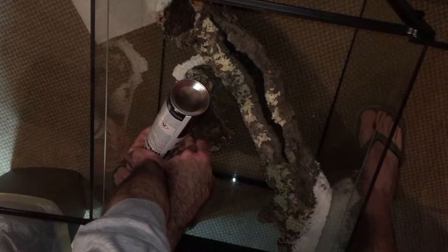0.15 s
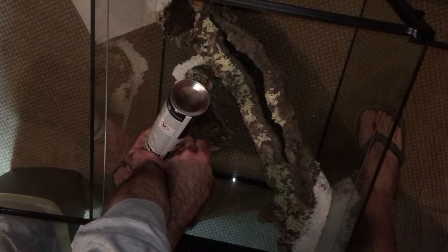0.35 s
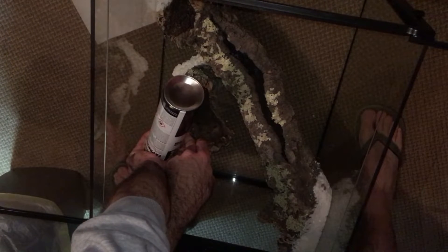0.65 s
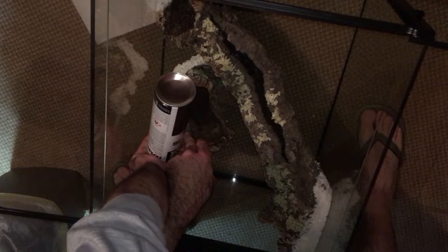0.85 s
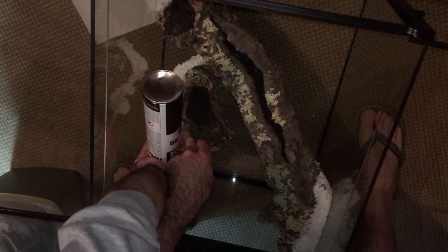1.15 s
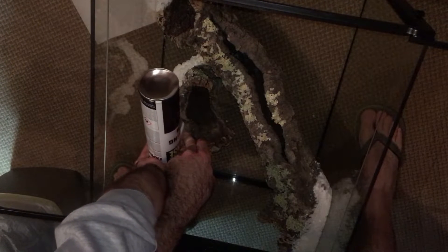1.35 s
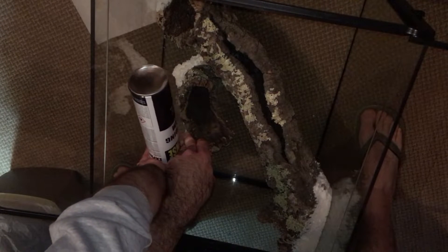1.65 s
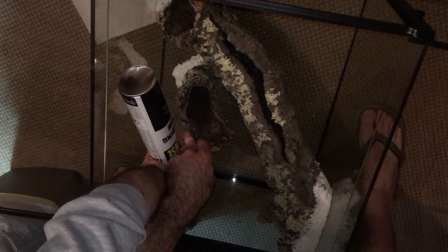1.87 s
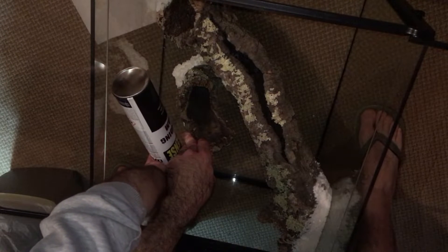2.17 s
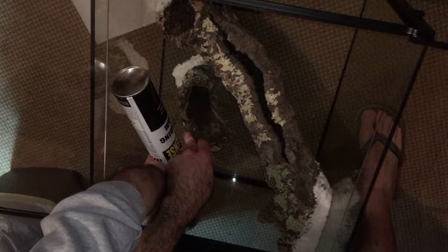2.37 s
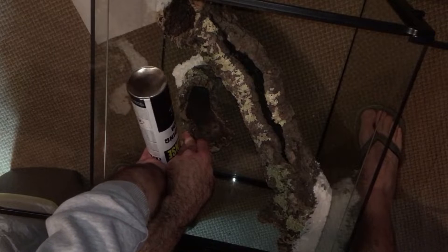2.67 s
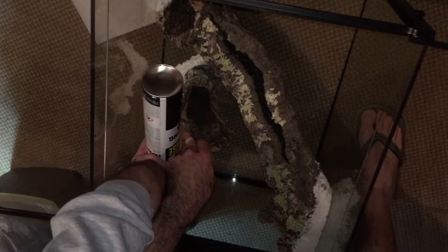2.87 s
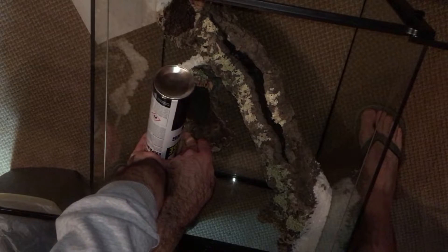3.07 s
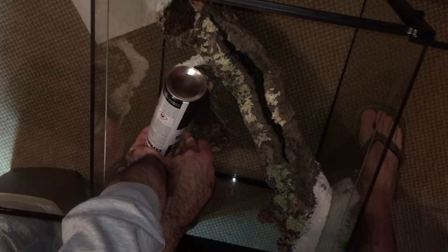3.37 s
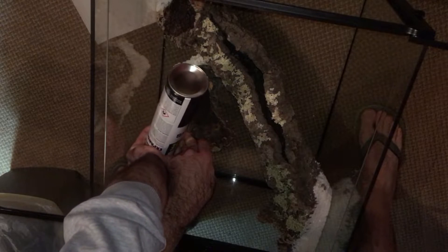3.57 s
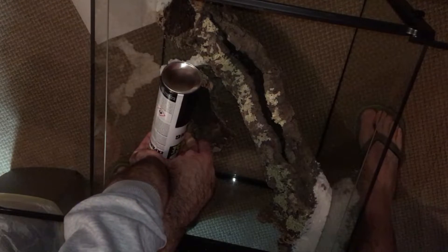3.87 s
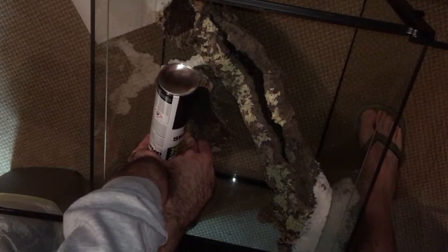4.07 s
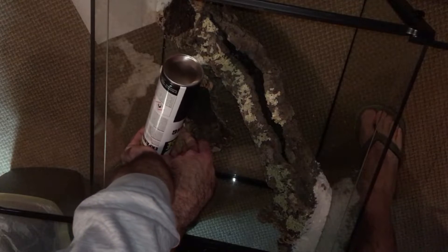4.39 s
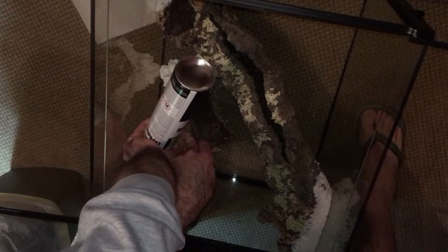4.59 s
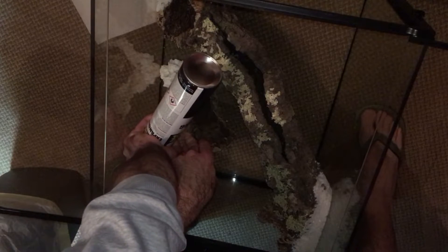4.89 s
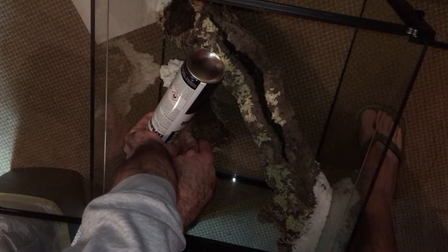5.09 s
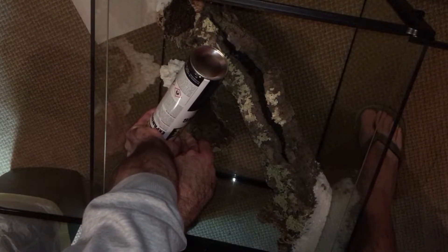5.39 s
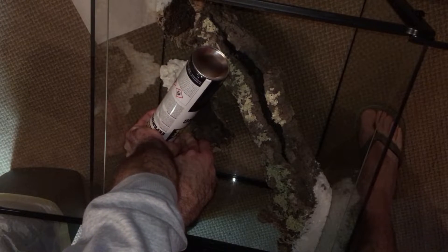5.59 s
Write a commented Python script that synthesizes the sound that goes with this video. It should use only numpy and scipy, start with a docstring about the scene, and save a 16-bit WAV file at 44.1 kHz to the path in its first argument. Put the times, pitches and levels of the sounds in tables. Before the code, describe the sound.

Close and mono in a small room with slight glassy resonance: a foam can hisses softly while bubbles pop and gurgle wetly. The flow thins, then gulps back with a hard wet pop and hollow ringing. It pauses, resumes, and bursts into rough crackling spray past the middle. Faint crackles die into quiet room air and low hum before one last bright, dry blast.

```python
"""Wet pops and a low gurgle over a hiss: expanding foam is squeezed from an upturned can into a glass tank.
Streams of ringing bubbles make the foam, filtered noise and clicks the hiss of the valve.
Twice, propellant breaks through in a loud, ragged spurt of crackle; fainter crackling follows the first.
The mono microphone is close, indoors: tank resonances and a small room colour the can and its foam,
over quiet room air and hum."""
import sys
import numpy as np
from scipy import signal
from scipy.fft import rfft, irfft, next_fast_len
from scipy.io import wavfile
from scipy.ndimage import uniform_filter1d

SR = 44100
rng = np.random.default_rng(int(sys.argv[2]) if len(sys.argv) > 2 else 0)


def wrap_up_sound(samples):
    """Save the sound to the file named by the first command line argument, as 16-bit audio."""
    columns = np.atleast_2d(samples).T
    # keep every value between -1 and 1, then stretch to whole-number steps
    tamed = np.clip(columns, -1, 1)
    steps = np.round(tamed * 32767).astype(np.int16)
    wavfile.write(sys.argv[1], SR, steps)


N = 253442
TIME = np.arange(N) / SR
SIZE = next_fast_len(N + SR)  # transform length, with room for filter tails
FREQ = np.maximum(np.arange(SIZE // 2 + 1) * SR / SIZE, 1)

# The largest bubbles bursting at the nozzle, and at 2.114 s the pop of a plug of foam letting go with a thud.
# Each row: time in seconds, relative peak in dB, pitch in Hz.
BURSTS = [(0.002, -19, 1000), (0.023, -15, 1450), (0.139, -19, 1020), (0.224, -20.5, 1020),
          (0.328, -20, 1040), (0.53, -20, 950), (0.573, -26, 923), (0.637, -26, 964), (0.705, -27.5, 910),
          (0.771, -28.5, 1020), (0.874, -29.5, 1060), (1.128, -28, 1050), (1.363, -27.5, 1180),
          (1.41, -29, 980), (1.48, -26, 1180), (1.514, -25.5, 993), (1.6, -22.5, 1390),
          (1.722, -22.5, 1180), (1.766, -27, 1170), (1.873, -26, 1170), (1.977, -21.5, 1400),
          (2.114, -13.5, 1950), (2.203, -17, 1100), (2.349, -19.5, 1170), (2.52, -14, 1110),
          (2.657, -16, 1070), (2.754, -18, 1040), (3.544, -18, 1100), (5.492, -30.5, 900),
          (5.528, -23.5, 900)]
# Propellant breaking through, one curve for each spurt.
# Each row: time in seconds, jet level in dB, dry spray relative to the jet in dB.
SPURT_CURVES = [
    [(3.62, -44.5, 2), (3.655, -31.5, -12), (3.675, -18, -11.5), (3.808, -15, -5.5), (3.856, -22.5, 0),
     (3.894, -15.5, -5.5), (3.962, -16.5, -9.5), (4.006, -25, -8), (4.06, -41.5, -16)],
    [(5.53, -36, -7.5), (5.592, -26.5, -3.5), (5.622, -10.5, -6.5), (5.675, -21, -1), (5.71, -19, -3),
     (5.74, -15.5, -11)],
]


def undb(db):
    """Decibels to gain."""
    return 10 ** (np.asarray(db) / 20)


def follow(table):
    """The columns of a control table at every sample."""
    s, *columns = np.transpose(table)
    return [np.interp(TIME, s, c) for c in columns]


def shape(x, db):
    """Causal minimum-phase filter with the given gain at every frequency."""
    cepstrum = irfft(db * np.log(10) / 20, SIZE)
    # fold the cepstrum onto positive time, so that nothing rings ahead of its cause
    cepstrum[1:SIZE // 2] *= 2
    cepstrum[SIZE // 2 + 1:] = 0
    response = np.exp(rfft(cepstrum))
    return irfft(rfft(x, SIZE) * response, SIZE)[:N]


def colour(x, points):
    """Filter by a spectrum of (Hz, dB) points, falling away beyond its ends."""
    hz, db = np.transpose(points)
    octaves_beyond = np.maximum(np.log2(hz[0] / FREQ), 0) + np.maximum(np.log2(FREQ / hz[-1]), 0)
    inside_db = np.interp(np.log(FREQ), np.log(hz), db)
    return shape(x, inside_db - np.minimum(24 * octaves_beyond, 60))


def band(x, lo, hi):
    """The part of a sound between two frequencies; neighbouring bands add up to the whole."""
    above = np.interp(FREQ, [.9 * lo, 1.1 * lo], [0, 1])
    below = np.interp(FREQ, [.9 * hi, 1.1 * hi], [1, 0])
    return irfft(rfft(x, SIZE) * above * below, SIZE)[:N]


def steady(x, lo, hi):
    """Scale a sound so that its band lo-hi holds rms 1 over each eighth of a second."""
    power = uniform_filter1d(band(x, lo, hi) ** 2, SR // 8)
    return x / np.sqrt(power + 1e-18)


def walk(rate):
    """Smooth chance with a spread near 1, changing rate times a second."""
    return np.interp(TIME * rate, np.arange(4096), rng.standard_normal(4096)) * np.sqrt(3 / 2)


def clicks(rate, spread_db):
    """Clicks at random moments, many small and a few large; rms 1."""
    size = undb(spread_db * np.minimum(rng.exponential(size=N), 4))
    sign = rng.choice([-1, 1], N)
    x = size * sign * (rng.random(N) < rate / SR)
    return x / np.std(x)


def ring(x, hz, width_hz):
    """A resonance with gain 1 at its centre."""
    return signal.lfilter(*signal.iirpeak(hz, hz / width_hz, fs=SR), x)


def swell(start, end, rise_s, fall_s):
    """An envelope that rises to 1 at its start, holds to its end and dies away."""
    before, after = np.maximum(start - TIME, 0), np.maximum(TIME - end, 0)
    return np.exp(-before / rise_s - after / fall_s) + 1e-12


def decays(times, sizes, fade_s):
    """An envelope that jumps at each time and dies away."""
    kicks = np.bincount(np.abs(times * SR).astype(int), sizes, N)[:N]
    return signal.lfilter([1], [1, -np.exp(-1 / (fade_s * SR))], kicks + 1e-18)


def bubbles(rows, cycles, glide):
    """Each (s, peak dB, Hz) bubble rings for a few cycles, rising in pitch as its skin opens."""
    s, db, hz = np.transpose(rows)
    length = (SR * cycles / hz).astype(int)
    bubble = np.repeat(np.arange(len(s)), length)  # which bubble each sample belongs to
    step = np.arange(len(bubble)) - (np.cumsum(length) - length)[bubble]
    age = step / length[bubble]  # 0 to 1 over the life of a bubble
    fade = np.exp(-np.log(1000) * age)
    wave = undb(db)[bubble] * fade * np.sin(2 * np.pi * cycles * age * (1 + glide * age))
    return np.bincount(np.abs(s * SR).astype(int)[bubble] + step, wave, N)[:N]


def froth(rate, centre_hz, octaves, spread_db, cycles):
    """A random stream of bubbles of mixed sizes."""
    when, size, pitch = rng.random((int(rate * N / SR), 3)).T
    db = spread_db * np.minimum(-np.log(1 - size), 4)
    hz = centre_hz * 2 ** (octaves * (2 * pitch - 1))
    return bubbles(np.transpose([when * N / SR, db, hz]), cycles, glide=0.17)


def room_tone():
    """Quiet room air as filtered noise over a mains hum that wavers in phase and level."""
    # Spectrum of the room air. Each row: frequency in Hz, relative level in dB.
    air_spectrum = [(40, -17.5), (60, -10.5), (115, -15.5), (160, -14.5), (350, -26.5), (800, -30.5),
                    (1900, -30.5), (2900, -37.5), (6000, -42), (13000, -42), (15700, -48.5)]
    air_db, hum_hz, hum_db = -64, 48, -67.5
    air = steady(colour(rng.standard_normal(N), air_spectrum), 70, 15800)
    hum = np.sqrt(2) * np.sin(2 * np.pi * hum_hz * TIME + .3 * walk(5.0))
    return undb(air_db + .8 * walk(5.4)) * air + undb(hum_db + 1.7 * walk(5)) * hum


def settling():
    """After the first spurt the fresh foam keeps crackling and burbling, ever more faintly."""
    spectrum = [(90, 9.5), (200, 15.5), (600, 2.5), (1500, 1.5), (4000, -15.0), (8000, -23.0), (15000, -20.5)]
    crackle = colour(clicks(rate=2300, spread_db=4.0), spectrum)
    age = TIME - SPURT_CURVES[0][-1][0]
    fade = np.exp(-np.abs(age) / 0.23) * (age > 0)
    return undb(-48.5) * fade * crackle / np.std(crackle)


def whistles():
    """The half-open valve whistles faintly as gas rings narrow resonances in it."""
    # Whistles at the valve. Each row: start in seconds, end in seconds, pitch in Hz, level in dB.
    whistle_rows = [(0, 0.752, 8170, -60), (1.0, 1.713, 5550, -63.5), (1.1, 1.698, 4520, -69)]
    gas, out = rng.standard_normal(N), 0
    for start, end, hz, db in whistle_rows:
        tone = ring(gas, hz, width_hz=120)
        out = out + undb(db) * swell(start, end, rise_s=.03, fall_s=.03) * tone / np.std(tone)
    return out


def valve():
    """Propellant hisses through the valve, and now and then rasps out between the bubbles."""
    # Opening of the valve, one curve for each pull of the trigger.
    # Each row: time in seconds, level of the finest mist in dB.
    openings = [
        [(0.0, -66), (0.45, -64), (0.75, -67), (1.85, -58.5), (2.4, -66.5), (2.85, -71.5), (3.3, -60),
         (3.5, -60), (3.62, -45)],
        [(5.43, -71.5), (5.52, -57)],
    ]
    # Gas surging through the foam. Each row: time in seconds, rasp level in dB, rise in seconds,
    # fall in seconds, hiss relative to the rasp in dB.
    surges = [(0.01, -51, 0.014, 0.057, -11), (1.9, -55, 0.27, .2, -28), (2.097, -38, 0.017, .018, -17),
              (2.18, -38, 0.026, .085, -18.5), (2.585, -33, .06, .035, -7.5)]
    # Spectrum of the hiss. Each row: frequency in Hz, relative level in dB.
    hiss_spectrum = [(1290, -34.5), (2200, -9), (2930, -5.5), (3160, -1.5), (4010, -5.5), (4460, -1),
                     (5000, -1), (5480, 2), (6620, -3), (9660, -3), (15700, -16)]
    # Spectrum of the rasp. Each row: frequency in Hz, relative level in dB.
    rasp_spectrum = [(2300, 0.5), (3100, -4.5), (4400, 0), (5100, -11.5), (6700, -14.5), (7500, -28),
                     (10000, -27.5), (15700, -31)]
    # the coarse hiss grows more slowly than the mist: its level at a reference mist, dB gained per dB of mist
    reference_hiss_db, reference_mist_db, hiss_per_mist = -54, -63.5, .28
    fade_s = 0.059  # time constant of the valve opening and shutting

    gas = rng.standard_normal(N) + undb(-2.0) * clicks(rate=1200, spread_db=3.0)
    hiss = colour(gas, hiss_spectrum) * undb(.6 * walk(40))
    coarse = band(hiss, 1, 10600)
    mist = steady(hiss - coarse, 11000, 15500)
    coarse = steady(coarse, 5200, 10000)
    rasp = colour(clicks(rate=1800, spread_db=3.5) * undb(3 * walk(70)), rasp_spectrum)
    rasp = steady(rasp, 2900, 6500)

    out = 0
    for pull in openings:
        (mist_db,) = follow(pull)
        coarse_db = reference_hiss_db + hiss_per_mist * (mist_db - reference_mist_db)
        is_open = swell(pull[0][0], pull[-1][0], fade_s, fade_s)
        out = out + is_open * (undb(coarse_db) * coarse + undb(mist_db) * mist)
    for s, db, rise, fall, hiss_db in surges:
        surge = rasp + undb(hiss_db) * (coarse + undb(-22) * mist)
        out = out + undb(db) * swell(s, s, rise, fall) * surge
    return out


def spits():
    """Small pockets of gas spit through the skin of the foam in puffs of a few milliseconds."""
    # Pockets of gas escaping. Each row: time in seconds, relative level in dB.
    pockets = [(1.725, -35), (1.925, -35), (2.0549, -25.5), (2.111, -25.5), (2.449, -28.5), (2.49, -26),
               (2.7104, -33), (3.2725, -35.5), (3.3156, -34), (3.4766, -34), (3.56, -26.5), (3.6065, -30),
               (4.3092, -60), (4.4594, -56), (4.5294, -56), (5.1499, -65)]
    s, db = np.transpose(pockets)
    gas = colour(rng.standard_normal(N), [(1000, 1.5), (4000, 2.5), (7000, -9.5), (15000, -18)])
    return undb(-4.5) * decays(s, undb(db), fade_s=0.0071) * gas / np.std(gas)


def spurts():
    """Gas tears the foam into droplets: dense crackle over a jet, wet and low or dry and sharp."""
    # What each spurt carries. Each row: wet splutter at full jet in dB, finest mist relative to the jet in dB
    # where the dry spray equals the jet.
    loads = [(-24, -10.5), (-29.5, 1)]
    # One spectrum for each spurt. Each row: frequency in Hz, relative level in dB.
    spectra = [
        [(59, -61), (100, -26.5), (243, -20), (313, -27.5), (413, -19), (449, -23.5), (555, -10.5), (865, -10),
         (1020, -5), (1530, -6.5), (2390, -1), (2890, -5.5), (3280, -4), (8860, -18), (15700, -30)],
        [(59, -47), (100, -17.5), (459, -17), (715, -5.5), (795, -11.5), (1670, -5.5), (1810, -4), (1970, -2.5),
         (3800, -4.5), (5000, -8.5), (5560, -1), (9640, -7), (10500, -3), (12400, 2), (15700, -6)],
    ]
    # the wet splutter grows slowly with the jet; the mist grows faster than the dry spray (dB per dB)
    full_jet_db, wet_per_jet, mist_per_dry = -14, 0.23, 1.3

    jet = clicks(rate=2500, spread_db=1.0) + undb(-2) * rng.standard_normal(N)
    jet = jet * undb(1.0 * walk(120))
    out = 0
    for curve, (wet_db, mist_db), spectrum in zip(SPURT_CURVES, loads, spectra):
        db, dry_db = follow(curve)
        gas = colour(jet, spectrum)
        wet = steady(band(gas, 70, 1450), 400, 1400)
        core = steady(band(gas, 1450, 5100), 1500, 5000)
        dry_spray = steady(band(gas, 5100, 10400), 5200, 10000)
        mist = steady(band(gas, 10400, SR), 10500, 15500)
        spray = core + undb(dry_db) * dry_spray + undb(mist_db + mist_per_dry * dry_db) * mist
        splutter = undb(wet_db + wet_per_jet * (db - full_jet_db)) * wet
        blowing = swell(curve[0][0], curve[-1][0], rise_s=0.005, fall_s=0.015)
        out = out + blowing * (undb(db) * spray + splutter)
    return out


def pops():
    """A large bubble bursts and sets off its neighbours in a short wet spatter; a loosened plug thuds."""
    # Plugs of foam letting go with a thud. Each row: time in seconds, level of the thud's low body in dB.
    plugs = [(2.114, -30)]
    burst = bubbles(BURSTS, cycles=14, glide=0.14)
    snap = band(bubbles(BURSTS, cycles=2.5, glide=0.61), lo=797, hi=6000)
    age = TIME[:SR // 10]
    spatter = rng.standard_normal(len(age)) * np.exp(-age / .011)
    spatter = spatter / np.linalg.norm(spatter)
    out = undb(-4.5) * burst + undb(5.0) * signal.fftconvolve(snap, spatter)[:N]
    for s, db in plugs:
        age = np.maximum(TIME - s, 0)
        body = np.sin(2 * np.pi * 172 * age) * np.exp(-age / .07)
        splat = band(rng.standard_normal(N), lo=256, hi=2400) * np.exp(-age / 0.015) * (age > 0)
        out = out + undb(db) * (body + undb(19.5) * splat)
    return out


def choke(depth_db, swell_s, gush_db, gush_s):
    """Gain of the flow: a swelling bubble blocks the nozzle; when it bursts, the held-back foam gushes out."""
    s, each = np.transpose(BURSTS)[0], np.ones(len(BURSTS))
    gush = decays(s, each, gush_s)
    blocked = decays(N / SR - s, each, swell_s)[::-1]  # a decay run backwards, growing up to each burst
    return undb(gush_db * gush - depth_db * blocked)


def foam():
    """Foam comes in uneven gulps: bubbles burst, a hollow rings with them and the straw gurgles."""
    # Foam leaving the nozzle, one curve for each pull of the trigger.
    # Each row: time in seconds, flow as splutter level in dB, small bubbles relative to it in dB.
    flow_curves = [
        [(0.0, -32, -1.5), (0.2, -35.5, -7), (0.45, -40, -8.5), (0.58, -38, -13), (0.63, -45.5, -10.5),
         (0.8, -52, -8), (1.02, -55.5, -11.5), (1.65, -47.5, -7), (2.05, -41, -5.5), (2.15, -31, -2.5),
         (2.27, -40, -1.5), (2.62, -31.5, -4), (2.72, -35, -9), (2.95, -52, -1.5), (3.12, -56, -6),
         (3.22, -46.5, -10.5), (3.42, -51.5, -8.5), (3.5, -40.5, -12), (3.62, -37.5, -5.5)],
        [(5.31, -77.5, -5), (5.405, -66.5, -5), (5.428, -51.5, -11), (5.48, -53, -9), (5.52, -54, -3)],
    ]
    # A hollow in the foam opens, rings under the popping and closes.
    # Each row: time in seconds, level in dB, rise in seconds, fall in seconds, pitch in Hz.
    hollows = [(2.03, -43.5, .16, .06, 1163), (2.28, -34, .1, 0.24, 1165), (2.51, -27, 0.036, 0.033, 1153),
               (2.69, -29, 0.059, .035, 1158), (2.765, -35.5, .02, .05, 1060)]
    # Spectrum of the bubbles. Each row: frequency in Hz, relative level in dB.
    bubble_spectrum = [(300, -27.5), (560, -16), (750, -8.5), (950, -1), (1340, -2), (1660, -4.5),
                       (2200, -8), (2900, -15.5), (4200, -21.5), (5000, -33)]
    # Spectrum of the gurgle. Each row: frequency in Hz, relative level in dB.
    gurgle_spectrum = [(72, -16), (92, 3.5), (120, -1.9), (138, -6), (172, 3), (240, 1.5), (330, -3.5),
                       (430, -2.5), (580, -13.5)]
    # the gurgle follows the flow: its level at a reference flow as the straw starts to fill, dB per dB of flow
    reference_gurgle_db, reference_flow_db, gurgle_per_flow = -50.5, -42.5, 0.5
    fill_db_per_s, straw_full_s = 1.96, 2.3  # it grows as the straw fills, then the straw stays full
    fade_s = 0.04  # time constant of the flow building up before a pull and dying after it

    gulps = walk(75)
    stream = froth(rate=900, centre_hz=1152, octaves=0.91, spread_db=2.5, cycles=5)
    stream += undb(1.5) * froth(rate=2000, centre_hz=3000, octaves=.8, spread_db=4.5, cycles=5)
    stream *= undb(2.0 * gulps)
    splutter = colour(stream, bubble_spectrum)
    large = band(splutter, 1, 1450)
    small = steady(splutter - large, 1500, 2800)
    large = steady(large, 700, 1400)
    gurgle = colour(clicks(rate=900, spread_db=2) * undb(0.98 * gulps), gurgle_spectrum)
    gurgle = steady(band(gurgle, 70, 2000), 80, 480)

    popping, gurgling, hollow = 0, 0, 0
    fill_db = fill_db_per_s * np.minimum(TIME, straw_full_s)
    for pull in flow_curves:
        db, small_db = follow(pull)
        flowing = swell(pull[0][0], pull[-1][0], fade_s, fade_s)
        gurgle_db = reference_gurgle_db + gurgle_per_flow * (db - reference_flow_db) + fill_db
        popping = popping + flowing * undb(db) * (large + undb(small_db) * small)
        gurgling = gurgling + flowing * undb(gurgle_db) * gurgle
    for s, db, rise, fall, hz in hollows:
        tone = ring(ring(stream, hz, width_hz=95), hz, width_hz=280)
        hollow = hollow + undb(db) * swell(s, s, rise, fall) * steady(tone, 900, 1400)
    return popping * choke(depth_db=2, swell_s=0.022, gush_db=1.0, gush_s=.02) + hollow + gurgling


def echoes(t60, delay):
    """Dense reflections of energy 1 that start after a delay and die away by 60 dB in t60 seconds."""
    tail = rng.standard_normal(N) * undb(-60 * TIME / t60) * (TIME > delay)
    return tail / np.linalg.norm(tail)


def space(x):
    """The treble flutters between glass walls; the room follows, duller and longer; tank modes colour both."""
    # Resonances and hollows of the glass tank. Each row: frequency in Hz, width in Hz, gain in dB.
    tank_modes = [(319, 89, -0.5), (422, 31, 6), (478.5, 18, -1), (786, 27, -2), (848, 6.9, 3),
                  (1000, 65, 3.5), (1614, 71, -3), (1721, 69, 3.5), (1826, 39, -9), (1900, 39, 2.5),
                  (2260, 68, -3), (2343, 78, 2), (2709, 49, -5.5), (2920, 220, -1), (3760, 240, 2),
                  (4460, 140, 3.5), (4400, 200, -1), (4976, 450, -4), (5900, 360, 1), (6070, 90, 2),
                  (7640, 550, -1.34), (9109, 220, 0), (9740, 550, 1), (10780, 550, -4.5), (12252, 480, 1)]
    flutter = band(echoes(t60=0.026, delay=0.0012), lo=1200, hi=22000)
    room = signal.lfilter(*signal.butter(1, 6000, fs=SR), echoes(t60=0.26, delay=0.0087))
    response = undb(-4.5) * flutter + undb(-11.0) * room
    response[0] += 1  # direct sound
    x = signal.fftconvolve(x, response[:SR] / np.linalg.norm(response))[:N]
    grid = FREQ[::20]  # a coarse grid is enough for the modes
    glass_db = 0
    for hz, width, db in tank_modes:
        distance = np.minimum(np.abs(grid - hz) / width, 4)
        glass_db = glass_db + db / 16 ** (distance ** 2)
    return shape(x, np.interp(FREQ, grid, glass_db))


def scene():
    """The can and its foam sound in the tank and room; the room tone joins them at one microphone."""
    can = foam() + pops() + valve() + whistles() + spits() + spurts() + settling()
    mono = space(can) + room_tone()
    return np.array([mono, mono])


def record(dry):
    """The recorder clips at full scale and cuts the lowest bass and the top."""
    low_cut = signal.butter(4, 38, "high", fs=SR, output="sos")
    top_cut = signal.ellip(12, .2, 90, 15700, fs=SR, output="sos")
    x = signal.sosfilt(low_cut, np.clip(dry, -1, 1))
    return signal.sosfilt(top_cut, x)


dry = scene()
out = record(dry)
wrap_up_sound(out)
```